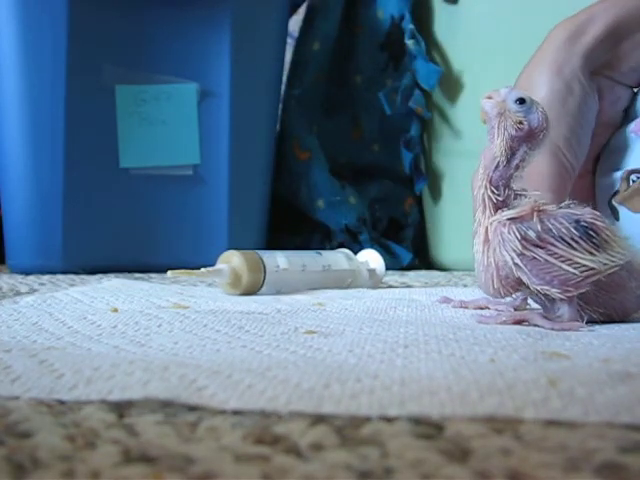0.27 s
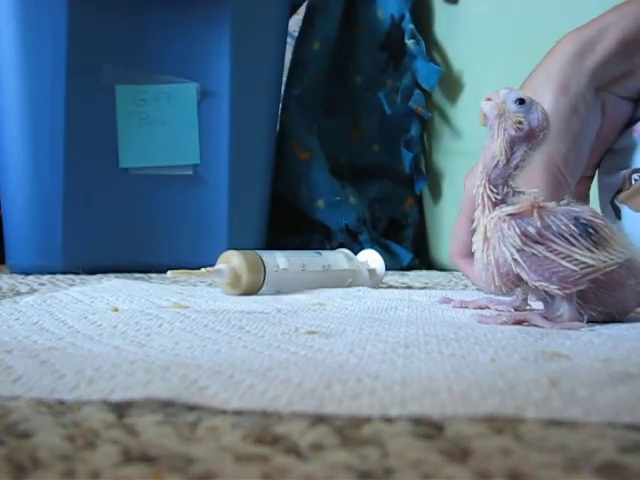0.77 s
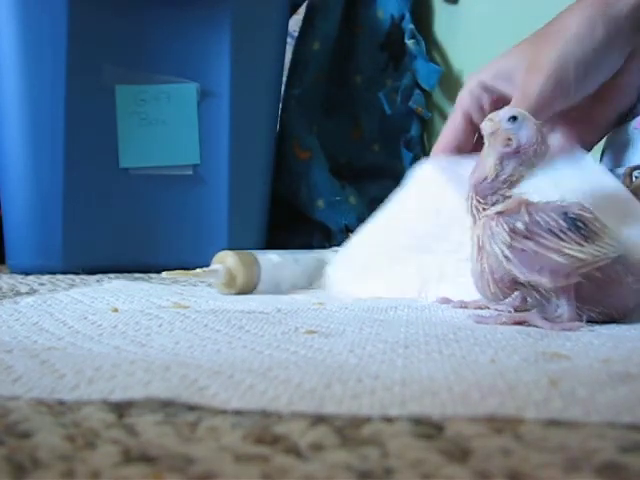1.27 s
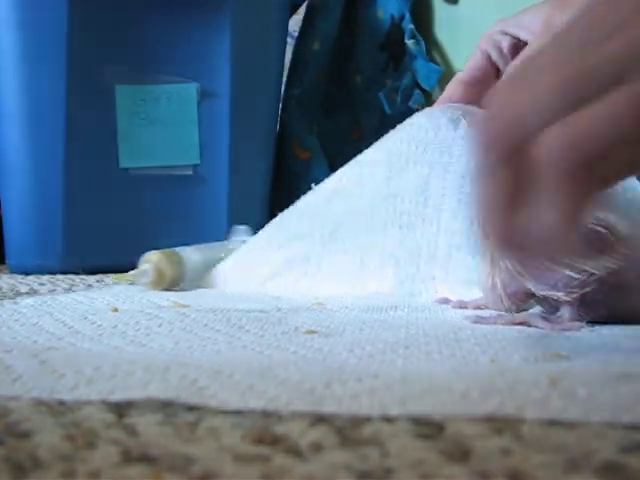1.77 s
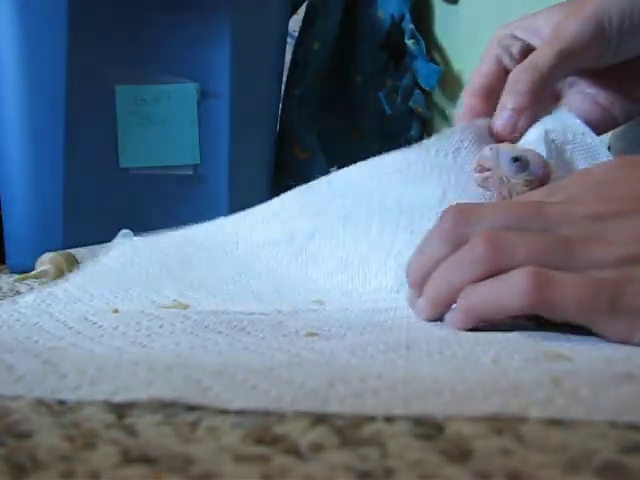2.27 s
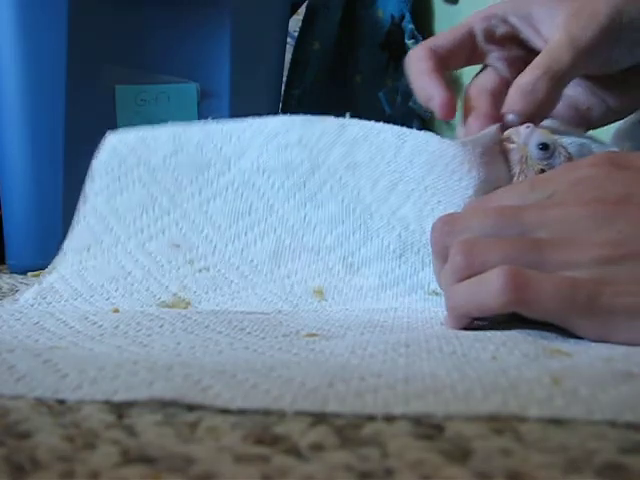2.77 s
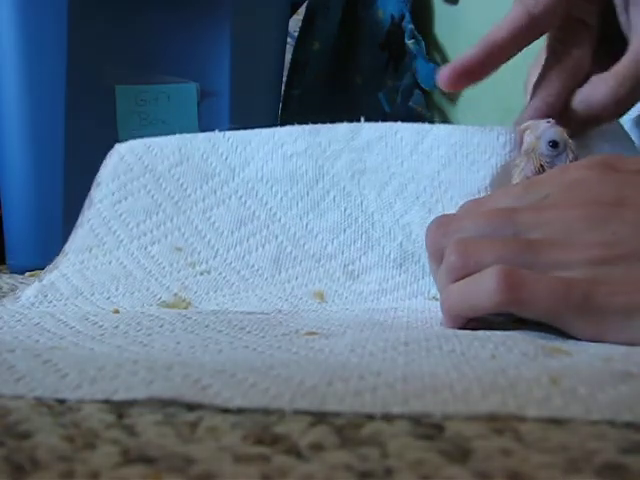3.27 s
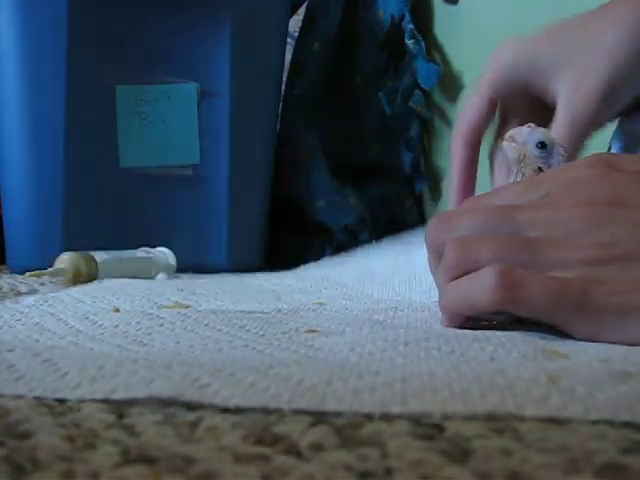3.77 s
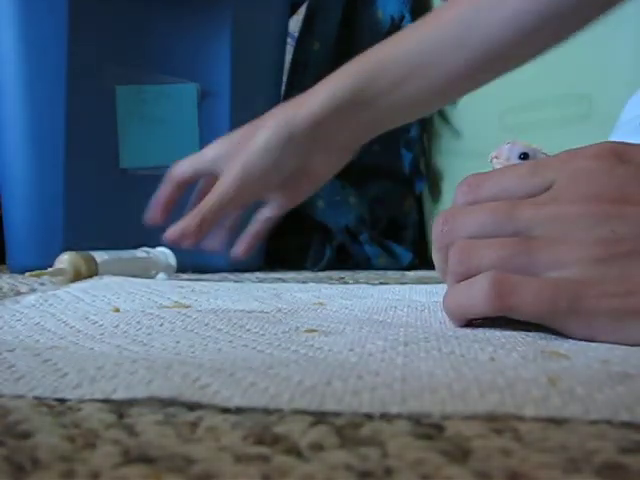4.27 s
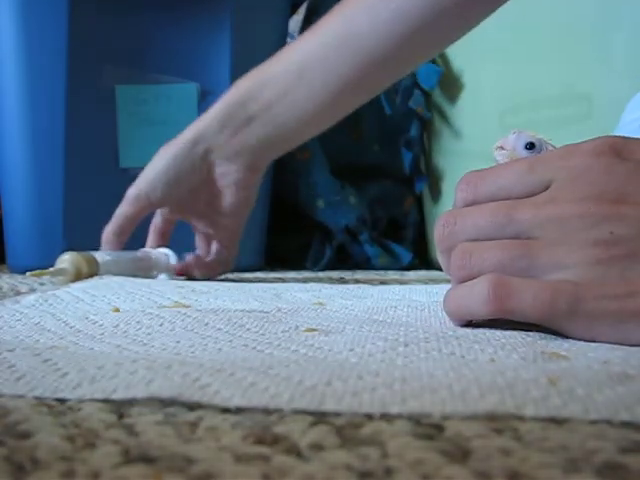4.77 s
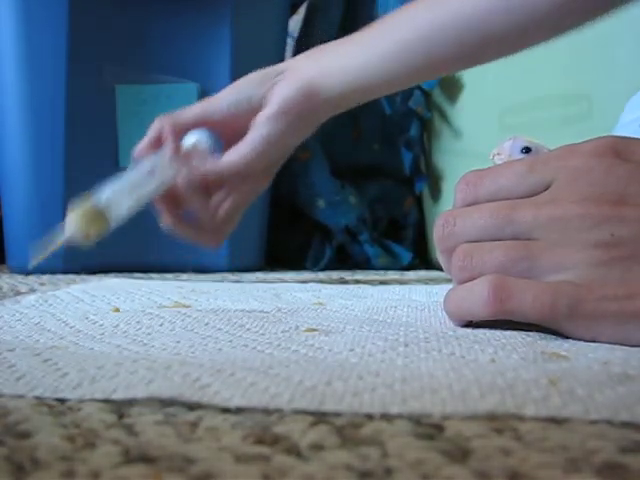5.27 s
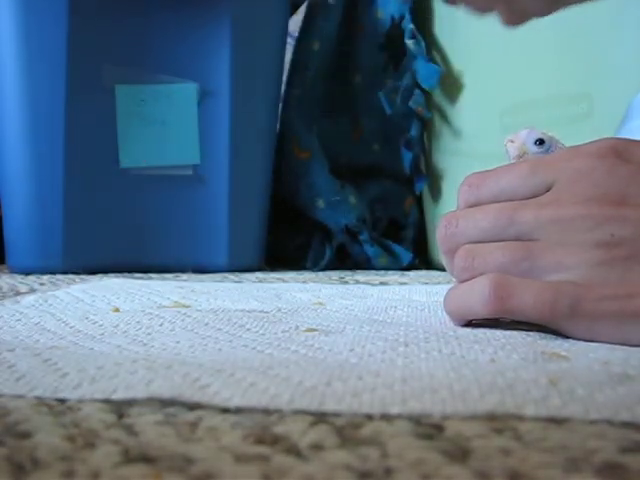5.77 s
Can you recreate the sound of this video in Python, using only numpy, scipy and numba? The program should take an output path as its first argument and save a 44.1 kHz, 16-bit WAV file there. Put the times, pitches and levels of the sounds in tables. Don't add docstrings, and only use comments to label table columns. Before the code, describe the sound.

Hands rub and knock a paper towel, then a chick squeaks thinly and rasps in harsher, louder bursts over faint appliance hum and hiss.

```python
import sys
import numpy as np
from scipy import signal
from scipy.fft import rfft, irfft, next_fast_len
from scipy.io import wavfile
from scipy.ndimage import uniform_filter1d
from numba import njit

SR = 44100
rng = np.random.default_rng(int(sys.argv[2]) if len(sys.argv) > 2 else 0)


def invert_db(level):
    return 10 ** (np.asarray(level, dtype=float) / 20)


def master_out(mix):
    frames = np.transpose(np.atleast_2d(mix))
    ceiling = np.clip(frames, -1, 1)
    pcm = np.round(ceiling * 32767).astype(np.int16)
    wavfile.write(sys.argv[1], SR, pcm)


N = 264864


def unit(x):
    return x / np.sqrt(np.mean(x ** 2))


def colour(x, points):
    hz, db = np.transpose(points)
    size = 4096
    bin_hz = np.arange(size // 2 + 1) * SR / size
    gain_db = np.interp(np.log(bin_hz + 1), np.log(hz), db)
    cepstrum = irfft(gain_db * np.log(10) / 20)
    cepstrum[1:size // 2] *= 2
    cepstrum[size // 2 + 1:] = 0
    impulse = irfft(np.exp(rfft(cepstrum)))
    return signal.fftconvolve(x, impulse)[:len(x)]


def band(x, lo_hz, hi_hz):
    return signal.sosfilt(signal.butter(3, [lo_hz, hi_hz], "band", fs=SR, output="sos"), x)


def high_pass(x, corner_hz):
    return signal.sosfilt(signal.butter(3, corner_hz, "high", fs=SR, output="sos"), x)


@njit
def resonance(x, centre_hz, width_hz):
    y = np.empty(len(x))
    band_state, low_state = 0., 0.
    for i in range(len(x)):
        g = np.tan(np.pi * centre_hz[i] / SR)
        damping = width_hz / centre_hz[i]
        v = (band_state + g * (x[i] - low_state)) / (1 + g * (g + damping))
        band_state = 2 * v - band_state
        low_state = low_state + 2 * g * v
        y[i] = damping * v
    return y


def walk(rate_hz):
    k = int(SR / rate_hz)
    held = np.repeat(rng.standard_normal(N // k + 1), k)
    return 1.267 * uniform_filter1d(uniform_filter1d(held, k), k)[:N]


def columns(rows):
    s, *cols = np.transpose(sorted(rows))
    return [np.interp(np.arange(N) / SR, s, c) for c in cols]


def swells(rows, attack_share, release_s, arch_db):
    start_s, length_s, db, *cols = np.transpose(rows)[:, :, None]
    t = np.arange(N) / SR - start_s
    attack = np.clip(t / (attack_share * length_s), 0, 1)
    release = np.exp(-np.clip(t - length_s, 0, None) / release_s * 3)
    arch = np.clip(2 * t / length_s - 1, -1, 1) ** 2
    power = (attack * release * invert_db(db - arch_db * arch)) ** 2
    total = power.sum(axis=0) + 1e-14
    return [np.sqrt(total)] + [(power * c).sum(axis=0) / total for c in cols]


def snaps(rate_hz, jitter, spread_db):
    gap, size = rng.standard_normal((N // 4, 2)).T
    at = np.cumsum(np.maximum(SR / rate_hz * np.exp(jitter * gap), 1)).astype(int)
    inside = at < N
    out = np.zeros(N)
    out[at[inside]] = invert_db(spread_db * np.clip(size[inside], -3, 1.6))
    return unit(out - out.mean())


def hiss():
    # f/Hz, level/dB per Hz
    hiss_curve = [(12, -34), (20, -22), (70, -15), (123, -12.5), (198, -21), (234, -23), (318, -4.5),
                  (398, -21.5), (498, -22.5), (823, -20), (921, -24.5), (1220, -29.5), (2740, -29.5),
                  (7920, -32.5), (15900, -38.5)]
    mid, side = (colour(invert_db(1.0 * walk(26)) * rng.standard_normal(N), hiss_curve) for _ in range(2))
    side = 0.21 * side + high_pass(side, 420)
    return invert_db(-60) * np.array([mid + side, mid - side]) / mid.std()


def hum():
    # f/Hz, rms/dB
    motor_lines = [(119.9, -68.5), (138.5, -69.5), (322.7, -55.5)]
    t = np.arange(N) / SR
    low = sum(invert_db(db + 1.0 * walk(5.6)) * np.sin(2 * np.pi * hz * t) for hz, db in motor_lines[:2])
    hz, db = motor_lines[2]
    line_gain = invert_db(db + 0.34 * walk(2.0))
    line = line_gain * np.sin(2 * np.pi * np.cumsum(hz + 1.13 * walk(5)) / SR)
    cabinet = invert_db(-65.0) * unit(band(rng.standard_normal(N), 296, 384))
    port_gain = invert_db([[-2.5], [2.0]])
    return np.sqrt(2) * low + (np.sqrt(2) * line + cabinet) * port_gain


def towel():
    # t/s, level/dB, brightness/dB
    contact = [(0, -59.5, 0.5), (1, -63.5, -1.5), (1.2, -60, 2), (1.65, -56.5, 0), (1.9, -66, 2.5),
               (1.95, -56.5, 0), (2.7, -56, 0), (2.8, -60.5, 6), (3.4, -65.5, -2.5), (4, -65.5, 1.5),
               (4.4, -71.5, -2), (5.1, -70.5, -2), (6, -66.5, 8)]
    # start/s, length/s, level/dB, brightness/dB
    strokes = [(-.04, .12, -57.5, 5.5), (.135, 0.022, -54, 0.5), (.195, 0.062, -53, 1.5),
               (.358, 0.094, -52.5, 0), (.528, 0.047, -54, -1), (.6, 0.046, -53, 0),
               (.648, 0.041, -49, 0.5), (.75, 0.054, -53.5, -1.5), (.895, 0.013, -57, -11),
               (.962, .055, -56.5, -6), (1.24, 0.17, -58, -5), (1.93, 0.19, -54.5, 0.5),
               (2.235, 0.045, -57.5, 3), (2.38, 0.037, -56.5, 4), (2.47, 0.12, -52.5, 3.5),
               (2.69, 0.044, -60, 5), (3.3, 0.083, -63, -5), (4.1, 0.044, -73, -2), (4.2, 0.048, -74, 16),
               (5.17, 0.098, -71.5, 14), (5.315, 0.15, -62, 6), (5.47, 0.052, -65.5, 8),
               (5.58, 0.073, -64.5, 4)]
    # f/Hz, level/dB per Hz
    paper_curve = [(250, -30), (430, -4), (667, 0.5), (1000, -1), (1360, 2.5), (3570, -6.5), (7600, -1.5),
                   (15900, -35)]

    rest_db, rest_tilt_db = columns(contact)
    stroke, stroke_tilt_db = swells(strokes, attack_share=0.15, release_s=0.0073, arch_db=3.5)
    rest_power, stroke_power = invert_db(rest_db) ** 2, stroke ** 2
    power = rest_power + stroke_power
    db = 10 * np.log10(power)
    tilt_db = (rest_power * rest_tilt_db + stroke_power * stroke_tilt_db) / power
    low_db, top_db = db - tilt_db, db + tilt_db
    mid_db = db - 1 - 0.63 * np.abs(tilt_db)

    crackle = snaps(600, 1.1, 5.5) * np.sign(rng.standard_normal(N))
    friction = rng.standard_normal(N) + 0.53 * crackle
    paper = colour(invert_db(0.72 * walk(60)) * friction, paper_curve)
    scrape = unit(band(paper, 210, 2450)) * invert_db(low_db - 1.0 + 1.14 * walk(25.49))
    middle = unit(band(paper, 2840, 6130)) * invert_db(mid_db + 6.0 + 1.1 * walk(24.44))
    rustle = unit(band(paper, 5090, 12300)) * invert_db(top_db + 2.5 + 0.49 * walk(25.4))
    drag = unit(band(crackle, 179, 353)) * invert_db(low_db - 9.5)
    return scrape + middle + rustle + drag


def ticks():
    # t/s, peak/dB, ring f/Hz, crack re peak/dB
    knock_rows = [(0.088, -42, 1230, -2), (0.113, -39.5, 667, -15), (0.614, -39, 640, -3),
                  (0.62, -40, 720, -3), (0.659, -25, 800, -32), (0.796, -33.5, 910, -8),
                  (0.829, -43, 800, -9), (0.848, -41, 850, -12), (0.889, -38.5, 1180, -14),
                  (0.973, -40, 537, -14), (1.002, -34, 620, -7), (1.832, -45.5, 715, 6),
                  (1.882, -45, 640, -8), (1.936, -40, 1500, -1), (2.031, -41, 1270, -15),
                  (2.371, -42.5, 1120, -10), (2.401, -38.5, 640, -5), (2.782, -41.5, 1130, 0.5),
                  (3.057, -45, 1220, 2), (3.112, -47.5, 700, 1)]
    # t/s, peak/dB, ring f/Hz, crack re peak/dB
    tick_rows = [(0.585, -52, 1300, 12), (1.042, -39, 2980, 1), (1.161, -54, 1190, 25),
                 (1.507, -41, 2630, 9), (2.173, -40, 2360, 1), (2.268, -43, 1920, -15),
                 (2.513, -38.5, 1550, 0), (2.531, -44, 1420, -2), (2.576, -41, 2080, 4),
                 (2.847, -42, 2480, 5), (3.461, -40, 2850, -4), (4.135, -54.5, 799, 8.5),
                 (4.468, -28, 2800, -3), (5.028, -30.5, 790, -25), (5.19, -49, 1210, -9),
                 (5.251, -49, 960, -9), (5.307, -38, 1280, 2), (5.419, -35.5, 1800, 1),
                 (5.718, -31, 1900, -3), (5.734, -32, 2200, -7), (5.746, -40.5, 2120, -14)]
    # t/s, peak/dB, f/Hz
    thud_rows = [
        (2.381, -58, 206),
        (3.5, -50, 191),
        (3.548, -48, 202),
        (3.597, -50, 151),
        (3.671, -45, 201),
        (3.731, -44, 223),
        (4.66, -43.5, 205),
        (4.811, -40, 232),
        (5.026, -42.5, 227.3),
    ]
    size = 2048
    out, t = np.zeros(N + size), np.arange(size) / SR
    hits = knock_rows + tick_rows
    noises = rng.standard_normal((len(hits), size))
    ring_decay = np.exp(-t / 0.0026)
    for (s, db, hz, crack_db), noise in zip(hits, noises):
        ring = (np.sin(2 * np.pi * hz * t) + 0.25 * np.sin(2 * np.pi * 2.13 * hz * t)) * ring_decay
        burst = noise * np.exp(-t / .0005)
        body = 3.4 * band(burst, 850, 4540)
        crack = band(burst, 3850, 8200)
        crack = invert_db(crack_db + 8.0) * crack / np.abs(crack).max()
        out[int(s * SR):int(s * SR) + size] += invert_db(db - 1.0) * (ring + body + crack)
    out = band(out, 213, 22000)
    for s, db, hz in thud_rows:
        swell = t / 0.0075 * np.exp(-t / 0.0039)
        out[int(s * SR):int(s * SR) + size] += invert_db(db + 11.0) * np.sin(2 * np.pi * hz * t) * swell
    return out[:N]


def whistles():
    # start/s, length/s, first f/Hz, last f/Hz, level/dB
    glides = [(0.773, 0.0091, 5240, 4130, -40.5), (1.038, .02, 3600, 4600, -46),
              (1.041, 0.02, 7940, 9300, -42), (1.056, 0.036, 4300, 5550, -46),
              (1.075, .04, 5520, 5770, -31), (1.108, 0.02, 5750, 3990, -38),
              (1.068, 0.0187, 3730, 4220, -41), (1.069, 0.0164, 7400, 8500, -46),
              (1.079, 0.035, 4320, 4520, -37.5), (1.081, 0.071, 3900, 4220, -43.5),
              (1.27, 0.016, 4330, 4200, -47), (1.498, 0.026, 2500, 4080, -48),
              (1.52, 0.05, 4060, 4120, -41), (1.523, 0.027, 8000, 8040, -31),
              (1.55, 0.061, 4450, 4200, -44), (1.508, .055, 6770, 7050, -41.5),
              (2.844, .03, 6900, 7230, -44), (2.854, 0.042, 3480, 3900, -38),
              (3.013, 0.026, 3250, 3420, -52), (5.725, 0.017, 3700, 3480, -44)]
    out, t = np.zeros(N), np.arange(N) / SR
    shake, flutter = 1 + .007 * walk(300), invert_db(2.0 * walk(260))
    for s, length_s, first_hz, last_hz, db in glides:
        on = slice(int(s * SR), int((s + length_s) * SR))
        part = np.clip((t[on] - s) / length_s, 0, 1)
        hz = (first_hz + (last_hz - first_hz) * part) * shake[on]
        phase = 2 * np.pi * np.cumsum(hz) / SR
        tone = np.sin(phase) + invert_db(-30) * np.sin(2 * phase)
        swell = np.abs(np.sin(np.pi * part)) ** 0.82
        out[on] += np.sqrt(2) * invert_db(db) * swell * flutter[on] * tone
    return out


def rasp():
    # start/s, length/s, throat level/dB, throat resonance f/Hz, beak re throat/dB
    pushes = [(1.04, 0.045, -52, 3160, 6.5), (1.075, 0.093, -56, 3200, -10), (1.515, 0.077, -45, 2310, 0),
              (2.79, 0.04, -45, 2120, -18), (2.865, 0.042, -42.5, 2820, -6), (2.89, 0.047, -41, 2100, -18),
              (2.94, 0.067, -46.5, 2900, -32), (3.46, 0.05, -43.5, 2500, -6.5),
              (3.49, 0.092, -39.5, 2200, -3.5), (3.535, 0.066, -38, 1780, -11),
              (3.6, 0.075, -43, 1840, -11), (3.737, .09, -36.5, 1600, -8), (3.79, 0.1, -35.5, 2040, -1.5),
              (3.85, 0.071, -38, 2180, -13.5), (4.48, 0.088, -34, 2420, -7), (4.55, 0.097, -35, 1950, -8.5),
              (4.615, 0.07, -35, 1780, -3.5), (4.742, 0.11, -36, 1380, -5.5), (4.8, 0.11, -33, 1900, -3),
              (4.89, 0.1, -33.5, 1770, -6.5), (4.98, 0.049, -43, 1600, -19), (5.74, 0.063, -40.5, 2450, -2),
              (5.78, 0.16, -36, 1960, -4.5), (5.935, 0.16, -40, 1700, -6.5)]
    # t/s, level/dB
    mouth_rows = [(1.05, 8), (1.12, 6.5), (1.55, 2), (2.8, 5.5), (2.875, 3), (2.97, -6), (3.5, 1.5),
                  (3.65, 4), (3.77, -5), (3.86, 5.5), (4.5, -2.5), (4.66, 1.5), (4.77, -4.5), (4.93, 0),
                  (5.76, 4.5), (5.9, -2), (5.95, -9), (6, -3)]
    catches = [
        4.516,
        4.523,
        4.548,
        4.85,
        5.728,
        5.742,
        5.825,
        5.86,
    ]
    # f/Hz, width/Hz, level/dB
    windpipe = [(942, 21, -0.5), (1570, 560, -3), (2120, 110, 1.5), (2900, 1300, -2)]
    # f/Hz, level/dB per Hz
    throat_curve = [(250, -63), (420, -12), (617, -2.5), (831, -3), (923, -3.5), (1090, -6.5), (1640, -3),
                    (2880, -3), (3400, -9), (4420, -81), (7480, -120)]
    # f/Hz, level/dB per Hz
    beak_curve = [(2710, -17), (4600, 0.5), (5920, -6.5), (6650, -6), (7820, -1.5), (11000, -18),
                  (14000, -20)]

    push, throat_hz, beak_db = swells(pushes, attack_share=0.18, release_s=0.066, arch_db=5)
    gape = swells(pushes, attack_share=0.18, release_s=0.017, arch_db=5)[0]
    throat_hz = np.clip(throat_hz, 1300, 3400)
    mouth_db = -7 + 7 * (throat_hz - 1900) / 1000 + 0.22 * beak_db + columns(mouth_rows)[0]
    effort = gape ** 2 / (gape ** 2 + invert_db(-36) ** 2)
    beak_lag_s = 0.019
    keep = np.exp(-1 / (beak_lag_s * SR))
    lagged = signal.lfilter([1 - keep], [1, -keep], effort)
    beak_hz = 7410 - 1700 * np.minimum(effort, lagged)

    stutter = invert_db(.6 * walk(120))
    stall = sum(np.exp(-((np.arange(N) / SR - s) / .0022) ** 2) for s in catches)
    source = stutter * invert_db(-16 * stall) * (snaps(1000, .4, 3.5) + .4 * rng.standard_normal(N))
    rings = sum(invert_db(db) * resonance(source, np.full(N, 1. * hz), 1. * width_hz)
                for hz, width_hz, db in windpipe)
    gullet = resonance(source, throat_hz, 480.)
    throat = unit(colour(source + 1.1 * rings + 1.7 * gullet, throat_curve))
    mouth = unit(resonance(band(source, 3310, 4290), 4150 + 150 * walk(25.44), 1530.0))
    beak_ring = resonance(source, beak_hz, 900.0)
    beak = unit(colour(band(source + 2.4 * beak_ring, 4830, 9700), beak_curve))
    opening = invert_db(mouth_db + 1.5) * mouth + invert_db(beak_db + 4.0) * beak
    return invert_db(-0.1) * throat * push + opening * gape


def ports(x):
    # lag/ms, level/dB, bounce lag/ms, bounce share
    port_rows = [(0.038, -1, 0.15, 0.39), (0.0093, 1.22, 0.12, 0.3)]
    room_t60_s, room_db = .09, -6.5
    size = next_fast_len(N + SR)
    turn_per_ms = -2j * np.pi * np.arange(size // 2 + 1) * SR / size / 1000
    t = np.arange(SR // 2) / SR
    decay = np.exp(-np.log(1000) * t / room_t60_s) * (t > .0015)
    tails = rng.standard_normal((2, len(t))) * decay
    tails *= invert_db(room_db) / np.sqrt((tails ** 2).sum(axis=1, keepdims=True))
    near = np.array([invert_db(db) * np.exp(turn_per_ms * lag_ms) * (1 + share * np.exp(turn_per_ms * bounce_ms))
                     for lag_ms, db, bounce_ms, share in port_rows])
    return invert_db(-1.5) * irfft(rfft(x, size) * (near + rfft(tails, size)), size)[:, :N]


def scene():
    return ports(rasp() + whistles() + towel() + ticks()) + hum() + hiss()


def top_cut(x):
    return signal.sosfilt(signal.butter(12, 16090, fs=SR, output="sos"), x)


def record(dry):
    low_pass = signal.ellip(10, .2, 70, 15650, fs=SR, output="sos")
    return top_cut(signal.sosfilt(low_pass, dry))


dry = scene()
out = record(dry)
master_out(out)
```